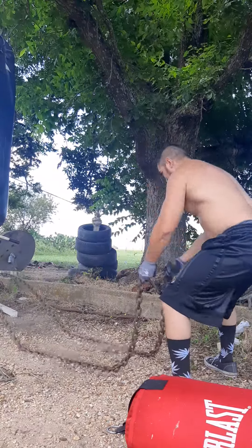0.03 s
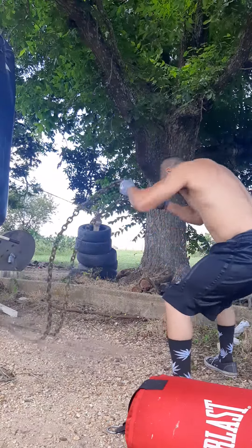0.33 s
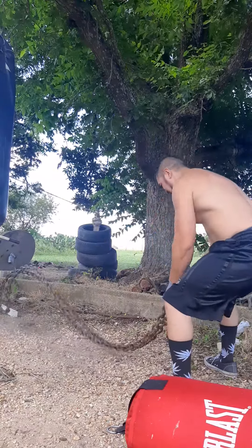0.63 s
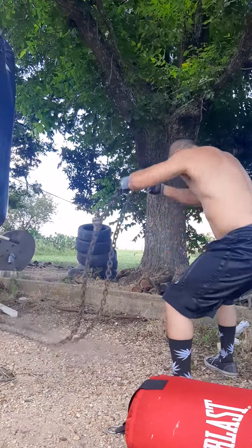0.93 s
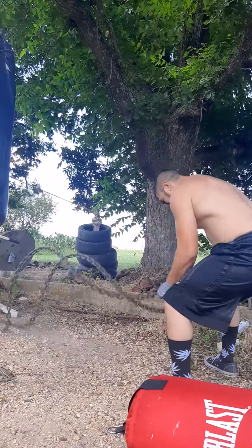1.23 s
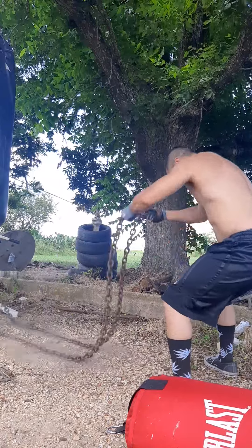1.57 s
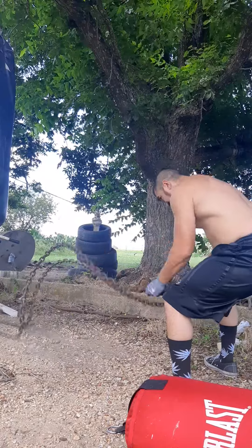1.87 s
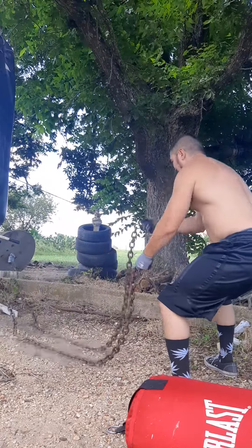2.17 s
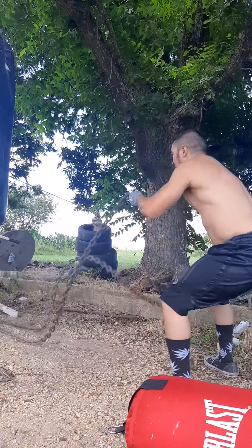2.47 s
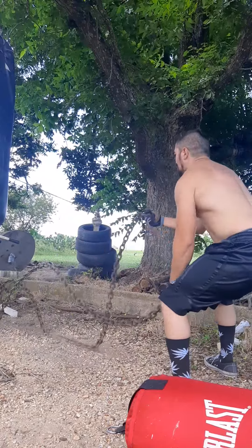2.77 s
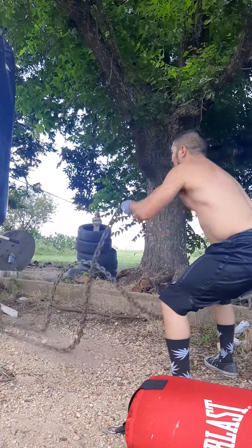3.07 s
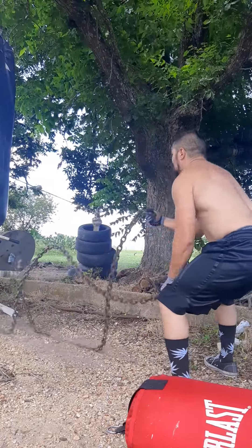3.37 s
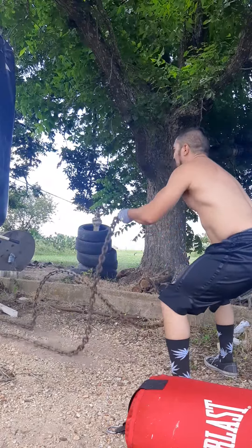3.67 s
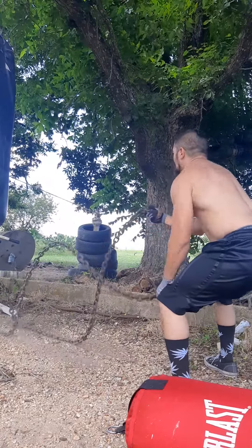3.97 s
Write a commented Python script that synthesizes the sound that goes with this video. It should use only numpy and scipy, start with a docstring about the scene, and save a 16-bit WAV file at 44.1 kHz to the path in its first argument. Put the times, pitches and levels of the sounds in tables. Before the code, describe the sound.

Heavy steel chains are whipped up and down over gravel for the whole four seconds, their bright, very high jingling surging about every third of a second. Sharp clashes, ringing metal and gravel crunches come in irregular clusters, strong around 0.4, 1.1, 1.9, 2.6 and 3.7 seconds. Dull ground thuds, a short echo and low outdoor rumble lie underneath, and a faint hum swells after about 3 seconds.

```python
"""Bright jingling and sharp clashes: two heavy steel chains are whipped up and down over gravel.
Each wave sets the small links ringing very high. Where a chain snaps tight or lands, gravel crunches,
links clash in a quick run and the heavy fittings ring. Underneath are dull thuds on the ground,
a low outdoor rumble, a short echo from the yard and a faint hum that swells near the end."""
import sys
import numpy as np
from scipy import signal
from scipy.fft import rfft, irfft
from scipy.io import wavfile

SR = 44100
rng = np.random.default_rng(int(sys.argv[2]) if len(sys.argv) > 2 else 0)


def output_pcm(signal):
    """Save a mono or channel-first signal as 16-bit PCM at the path in sys.argv[1].

    Samples are clipped to [-1, 1] before scaling.
    """
    pcm = np.clip(np.atleast_2d(signal).T, -1, 1) * 32767
    wavfile.write(sys.argv[1], SR, np.round(pcm).astype(np.int16))


N = 176400  # 4 seconds

# how hard the chains are shaken (time [s], level [dB])
SHAKING = [(0.0, -41), (0.04, -20), (0.12, -17), (0.24, -35.5), (0.27, -22), (0.34, -36), (0.39, -17.5),
           (0.58, -35.5), (0.62, -53), (0.67, -38), (0.71, -40), (0.76, -17), (0.8, -19.5), (0.86, -19.5),
           (0.92, -38), (1.01, -19), (1.08, -31), (1.12, -18), (1.19, -21.5), (1.35, -60), (1.41, -24.5),
           (1.48, -15.5), (1.55, -21.5), (1.67, -45), (1.69, -23.5), (1.77, -38), (1.85, -19), (1.87, -25),
           (1.89, -18.5), (2.02, -35.5), (2.07, -31), (2.12, -17), (2.19, -15), (2.21, -22), (2.27, -25),
           (2.33, -36), (2.38, -29), (2.44, -20.5), (2.47, -28.5), (2.57, -22.5), (2.67, -28), (2.68, -20),
           (2.75, -18), (2.92, -34.5), (2.96, -19), (3.01, -18.5), (3.06, -26), (3.09, -26), (3.25, -27.5),
           (3.32, -19.5), (3.36, -21), (3.4, -34.5), (3.54, -26.5), (3.58, -33), (3.65, -14), (3.78, -32.5),
           (3.83, -27.5), (3.9, -17), (3.94, -31), (4.0, -29)]


def gain(db):
    """Turn decibels into a multiplier."""
    return 10 ** (np.asarray(db) / 20)


def normalise(x):
    """Scale a sound to an average (rms) size of 1."""
    return x / np.sqrt(np.mean(x ** 2) + 1e-18)


def loudness(rows):
    """A volume curve through (time [s], level [dB]) points."""
    return gain(np.interp(np.arange(N) / SR, *np.array(rows).T))


def across_spectrum(rows, size):
    """Fill in every frequency between (frequency [Hz], value) points."""
    hz, value = np.array(rows).T
    return np.interp(np.log(np.fft.rfftfreq(size, 1 / SR) + 1), np.log(hz), value)


def shape_tone(x, rows):
    """Filter a sound to follow (frequency [Hz], level [dB]) points."""
    cepstrum = irfft(np.log(gain(across_spectrum(rows, size=1024))))
    cepstrum[1:512] *= 2  # folded so that nothing sounds before its hit
    cepstrum[513:] = 0
    return signal.fftconvolve(x, irfft(np.exp(rfft(cepstrum))))[:len(x)]


def fade(fade_s, size):
    """Die away by 60 dB in fade_s seconds."""
    return np.exp(-np.log(1000) * np.arange(size) / SR / max(fade_s, .005))


def note(hz, fade_s, size):
    """One pure, fading note of struck steel."""
    return np.sin(2 * np.pi * (hz * np.arange(size) / SR + rng.random())) * fade(fade_s, size)


def clicks(per_s, scatter_db, size):
    """Random collisions of uneven strength."""
    hits = (rng.random(size) < per_s / SR) * rng.choice([-1, 1], size)
    return hits * gain(scatter_db * np.clip(rng.standard_normal(size), -2, 2))


def stereo_noise(size):
    """Left and right noise, alike at some pitches and unrelated at others."""
    # how alike the two sides are (frequency [Hz], likeness [0-1])
    likeness = [(50,0.13),(150,0.07),(450,0.67),(1200,0.1),(3000,0),(6000,0.11),(16000,0.82)]
    alike = np.clip(across_spectrum(likeness, size), 0, 1)
    middle, side = rfft(rng.standard_normal((2, size)))
    return irfft(middle * np.sqrt(1 + alike) + side * np.sqrt(1 - alike) * [[1], [-1]], size)


def add_hit(out, start_s, x, db, attack_s=0.034):
    """Mix in a sound so that its opening moment has the given level."""
    i = int(start_s * SR)
    x = x * gain(db) / np.sqrt(np.mean(x[:int(attack_s * SR)] ** 2) + 1e-18)
    out[i:i + len(x)] += x[:N - i]


def rumble(wander):
    """Low outdoor noise whose level drifts."""
    # tone of the outdoor air (frequency [Hz], level [dB])
    air_tone = [(20,-27),(40,-17),(70,0),(120,2),(180,-6),(400,-6),(800,-10.5),(2000,-13),(6000,-15),(16000,-65)]
    air = np.array([shape_tone(x, air_tone) for x in stereo_noise(N)])
    return normalise(air) * gain(-39.5 - 3.5 * wander)


def jingle(count=24, hits_per_s=2600):
    """Each small link rings at its own very high note and ticks against its neighbours."""
    # groups of link notes (centre [Hz], spread [Hz], level [dB])
    groups = [(14170,200,-4),(14690,220,-1.5),(15190,240,0)]
    # tone of a tick (frequency [Hz], level [dB])
    tick_tone = [(150,-15),(400,8),(1400,-12.5),(3000,-4),(6500,6),(9000,4),(12000,10),(14000,-4.5),(16000,13)]
    ringing, ticks = np.zeros((2, N)), np.zeros((2, N))
    for centre, spread, db in groups:
        for hz in centre + spread * np.linspace(-1, 1, count) * rng.uniform(.5, 1.2, count):
            hits = clicks(hits_per_s / count / len(groups), scatter_db=-2, size=N)
            ticks += hits * np.abs(hits) ** .7  # hard hits tick more than they ring
            for channel in ringing:
                channel += gain(db) * signal.oaconvolve(hits, note(hz, fade_s=0.041, size=8192))[:N]
    rasp = rng.standard_normal((2, 2048)) * fade(0.011, size=2048)
    ticks = signal.oaconvolve(ticks, rasp, axes=1)[:, :N]
    ticks = np.array([shape_tone(x, tick_tone) for x in ticks])
    return loudness(SHAKING) * (normalise(ringing) * gain(2) + normalise(ticks) * gain(-8.5))


def slack_links(count=30, hits_per_s=140):
    """Loose links clink at their own pitches whenever the chain moves."""
    clinks = np.zeros(N)
    for hz in rng.uniform(790, 4500, count):
        hits = clicks(hits_per_s / count, scatter_db=-2, size=N)
        clinks += signal.oaconvolve(hits, note(hz, fade_s=0.074, size=8192))[:N]
    return loudness(SHAKING) * normalise(clinks) * gain(-20)


def run_of_hits(fade_s, strength=1, rest_s=0.13, size=11025):
    """One hard collision, then a dying run of others until the links come to rest."""
    moving = np.exp(-(np.arange(size) / SR / rest_s) ** 4)
    slam = 1 + 0.91 * fade(0.087, size)  # many links land together at first
    hits = strength * clicks(per_s=700, scatter_db=4.5, size=size) * fade(fade_s, size) * moving * slam
    hits[0] = 1.75
    return hits


def gravel_crunch(fade_s):
    """Landing links knock the stones together."""
    # tone of the gravel (frequency [Hz], level [dB])
    gravel_tone = [(100,-22.5),(250,-8.5),(420,2.5),(600,-1.5),(820,3.5),(1020,-1.5),(1250,4.5),(1550,2),(1780,-11.5),(2200,4),(3000,2.5),(6000,-35.5),(16000,-39)]
    return shape_tone(run_of_hits(0.79 * fade_s), gravel_tone)


def link_clash(fade_s):
    """Links strike each other and ring very briefly."""
    # tone of the clash (frequency [Hz], level [dB])
    clash_tone = [(500,-74),(1800,1),(2500,-9.5),(3300,-3),(3900,2.5),(4600,0),(5400,3.5),(6500,-1),(8000,-5.5),(9000,-14),(13000,-5),(16000,-45)]
    steel = sum(note(hz, fade_s=0.033, size=8192) for hz in rng.uniform(2003, 9000, size=40))
    steel *= 0.63 / np.linalg.norm(steel)
    steel[0] += 1  # the click of contact
    return shape_tone(signal.fftconvolve(run_of_hits(fade_s), steel), clash_tone)


def ring_fittings(out, start_s, fade_s, low_db, main_db, high_db):
    """A run of hits rings the heavy fittings; their load shifts the notes a little at every blow."""
    # three families of notes in the fittings (pitch [Hz], relative level [dB], fade time [s])
    low_notes = [(1988,-7,.33),(2642,0,.6),(3540,-3,.3)]
    main_notes = [(844,-15.5,0.38),(1222,-16.5,0.16),(1988,-5,0.095),(3038,4.5,.22),(3050,4,0.3),(3200,-7,0.22),(3224,0,0.14),(3450,-4,0.17),(3884,-7.5,0.17),(3970,-8,0.16)]
    high_notes = [(4427,0,.25),(4732,-12,.3),(4857,-9,.3),(5843,-11,.2)]
    for notes, db in (low_notes, low_db + 4.5), (main_notes, main_db + 0.5), (high_notes, high_db - 3.5):
        hits = run_of_hits(fade_s / 2, strength=0.4)
        total_db = 20 * np.log10(np.linalg.norm(gain(np.array(notes)[:, 1])))
        for hz, share_db, ring_s in notes:
            shifted_hz = hz * (1 + 0.0019 * rng.standard_normal())
            ring = signal.fftconvolve(hits, note(shifted_hz, ring_s, size=SR * 3 // 4))
            add_hit(out, start_s, ring, db + share_db - total_db + 0.5 * rng.standard_normal())


def chain_blows():
    """Each blow crunches gravel, clashes links and rings the fittings; some clashes lie to the sides."""
    # a chain snaps tight or lands; each sound adjusts these base values (time [s], gravel [dB],
    # clash [dB], low ring [dB], main ring [dB], high ring [dB], fade time of the run of hits [s])
    blows = [(0.164, -35.5, -34.5, -35.5, -28.5, -44, 1), (0.252, -34.5, -25, -55.0, -52, -41, 0.82),
             (0.26, -27.5, -18.5, -55.0, -55, -21.5, 0.4), (0.322, -36.5, -44, -35.0, -30.5, -55.0, 0.26),
             (0.381, -24.5, -19.5, -39, -21.5, -55.0, 0.52), (0.433, -27.5, -21.5, -28, -24.5, -26, 0.48),
             (0.489, -52, -52, -57, -26, -47, 0.16), (0.643, -35.5, -41, -49, -53, -53, 1),
             (0.681, -30.5, -30, -62, -61, -57, 1), (0.83, -34.5, -36, -45, -49, -53, 0.96),
             (0.895, -41, -42.5, -37, -41.5, -51, 0.98), (0.95, -21.5, -20, -42.0, -27, -25, 0.25),
             (1.109, -26.0, -23.5, -57, -30, -55.0, 0.57), (1.12, -47, -22.5, -49, -18, -55.0, 0.36),
             (1.154, -36, -22, -21.5, -23.5, -55.0, 0.32), (1.362, -42, -39, -43, -56, -54, 1),
             (1.385, -36.5, -29, -56, -58, -56, 1), (1.425, -26, -27, -35.5, -31.0, -52, 0.33),
             (1.587, -40, -42.5, -42, -54, -62, 0.17), (1.649, -40.5, -32, -33, -33.0, -55, 0.86),
             (1.692, -28.5, -22.5, -48.0, -40, -26, 0.97), (1.7, -43, -20.5, -56, -50, -19.5, 0.14),
             (1.798, -29.0, -22.5, -32, -37, -55.0, 0.41), (1.828, -39, -20, -59, -22.5, -55.0, 0.33),
             (1.895, -30, -18.0, -36, -23.5, -26, 0.46), (2.012, -30.5, -29.5, -46, -27, -55.0, 0.28),
             (2.036, -30.5, -25.5, -56, -33, -34, 0.52), (2.067, -26.5, -26.5, -62, -35, -44, 1),
             (2.092, -27.5, -21.5, -36, -25.5, -53, 0.57), (2.151, -27.5, -23.5, -60, -66, -43, 0.13),
             (2.327, -47, -37.5, -31.5, -26.5, -43, 0.17), (2.407, -43, -37, -55.0, -32, -60, 0.19),
             (2.491, -50, -34, -61, -25.0, -57, 0.17), (2.506, -34, -42, -39, -27, -55.0, 0.22),
             (2.548, -32.5, -23, -55, -16.0, -52, 0.13), (2.589, -34.5, -25.5, -28.5, -55.0, -38.0, 0.39),
             (2.64, -28.5, -29, -30.5, -18, -46, 0.58), (2.673, -43, -21.5, -59, -25.5, -55.0, 0.6),
             (2.691, -21.5, -27, -60, -61, -55.0, 0.18), (2.739, -30.5, -26.5, -55.0, -27.5, -53.0, 0.88),
             (2.786, -22.5, -26.5, -32.5, -30.5, -30, 0.41), (2.867, -29.5, -31.5, -41.0, -23, -47, 0.35),
             (2.884, -43, -30.5, -62, -56, -35, 0.26), (3.033, -32, -30.5, -36, -30.5, -47, 0.31),
             (3.121, -30, -27.5, -37.0, -36, -32, 0.25), (3.148, -32.0, -45, -61, -60, -46, 0.32),
             (3.221, -32.5, -29.5, -53, -34, -58, 0.28), (3.28, -41, -37.5, -46, -65, -59, 0.28),
             (3.319, -37.0, -43, -67, -40.5, -63, 1), (3.37, -28.5, -22.5, -34, -21, -49, 0.23),
             (3.588, -39.5, -38, -65, -71, -59, 0.26), (3.625, -37.5, -45, -33.0, -36.5, -56, 0.48),
             (3.673, -32, -28.5, -33, -34.0, -50, 0.7), (3.745, -25.5, -17.0, -55.0, -16.5, -29, 0.26),
             (3.848, -31, -30, -32, -20.5, -55.0, 0.35), (3.879, -33, -38, -57, -55.0, -36, 0.32),
             (3.943, -32.5, -36.5, -58, -28.5, -61, 0.96)]
    middle, side = np.zeros(N), np.zeros(N)
    for start_s, gravel_db, clash_db, low_db, main_db, high_db, fade_s in blows:
        add_hit(middle, start_s, gravel_crunch(fade_s), gravel_db)
        add_hit(middle, start_s, link_clash(fade_s), clash_db)
        add_hit(side, start_s + rng.uniform(0, .003), link_clash(fade_s), clash_db)
        ring_fittings(middle, start_s, fade_s, low_db, main_db, high_db)
    return middle, 0.51 * np.array([side, -side])


def with_yard_echo(x, left_delay_s=.000035):
    """The direct sound, slightly later on the left, plus a short blurred echo from the yard."""
    # tone of the echo (frequency [Hz], level [dB])
    echo_tone = [(50,0),(500,-3),(2000,-2),(6000,0.2),(16000,0.4)]
    tail = np.array([shape_tone(noise, echo_tone) for noise in stereo_noise(SR)]) * fade(0.15, SR)
    tail *= gain(-2) / np.linalg.norm(tail[0])
    left = irfft(rfft(x) * np.exp(-2j * np.pi * np.fft.rfftfreq(N, 1 / SR) * left_delay_s), N)
    return np.array([left, x]) + signal.fftconvolve(x[None], tail, axes=1)[:, :N]


def thuds():
    """Weight lands on packed ground; the boom reaches each side differently."""
    # landings (time [s], unused peak [dB], base level [dB])
    landings = [(0.179, -33, -56), (0.241, -31, -55), (0.768, -31, -36), (0.958, -29, -54),
                (1.351, -23, -34), (1.394, -24, -35.5), (1.429, -30, -35), (1.76, -25, -36.5),
                (1.831, -25, -42), (2.098, -30, -53), (2.141, -27, -59), (2.328, -30, -43.5),
                (2.384, -27, -40.5), (2.998, -27, -37.5), (3.106, -27, -41.5), (3.799, -29, -42.5)]
    # tone of the ground (frequency [Hz], level [dB])
    ground_tone = [(25,-24),(70,6),(120,-4.5),(200,-4),(320,-1),(450,-5.5),(900,-28),(4000,-52)]
    out = np.zeros((2, N))
    for start_s, _, db in landings:
        for channel in out:
            add_hit(channel, start_s, shape_tone(run_of_hits(fade_s=0.45), ground_tone), db + 4)
    return out


def far_hum(wander, hz=117.5):
    """A faint, distant hum wavers and swells near the end."""
    # swell of the hum (time [s], base level [dB])
    swell = [(0,-67.5),(2.8,-58),(3.5,-43),(4,-38)]
    tone = np.sin(2 * np.pi * hz * np.arange(N) / SR + 0.42 * wander)
    waver = gain(2 * wander[::-1] - 4)
    return loudness(swell) * waver * normalise(tone)


def scene():
    """Mix the chains in the yard with the rumble and the hum."""
    jingling = jingle()
    middle, sides = chain_blows()
    chains = with_yard_echo(middle + slack_links()) + sides + jingling + thuds()
    wander = np.interp(np.arange(N), np.linspace(0, N, 40), rng.standard_normal(40))  # slow random drift
    return chains + rumble(wander) + far_hum(wander)


def record(dry, top_hz=15750):
    """Hold peaks to full scale and cut the highest treble."""
    return signal.sosfilt(signal.ellip(10, .2, 80, top_hz, fs=SR, output="sos"), np.clip(dry, -1, 1))


dry = scene()
out = record(dry)
output_pcm(out)
```